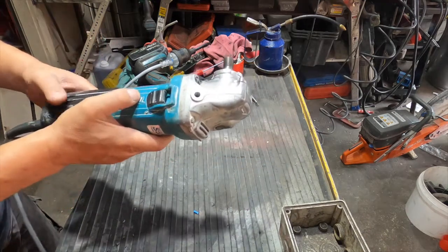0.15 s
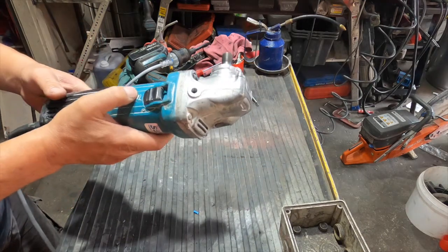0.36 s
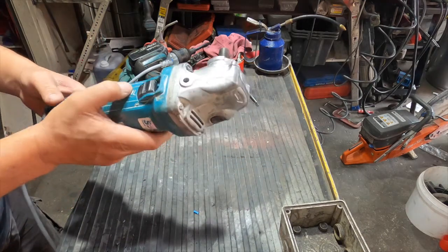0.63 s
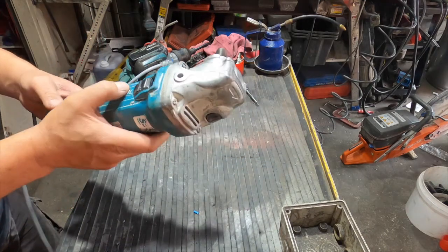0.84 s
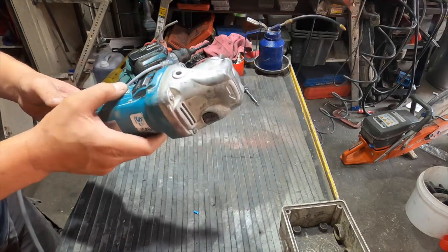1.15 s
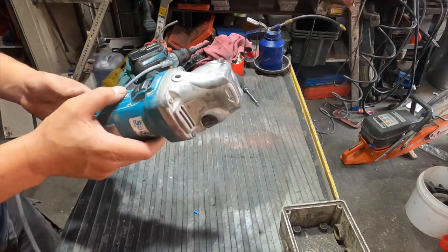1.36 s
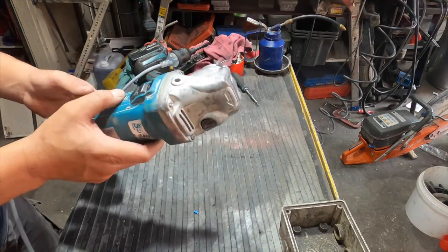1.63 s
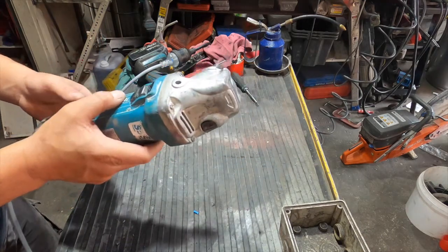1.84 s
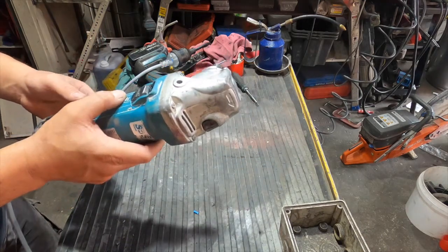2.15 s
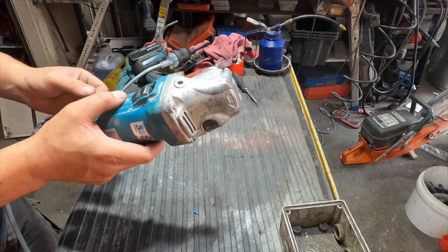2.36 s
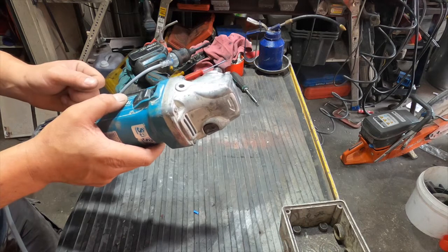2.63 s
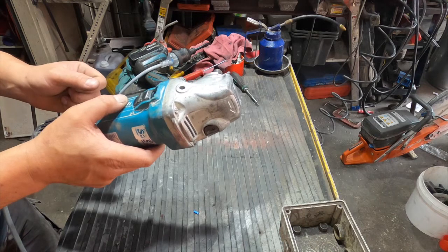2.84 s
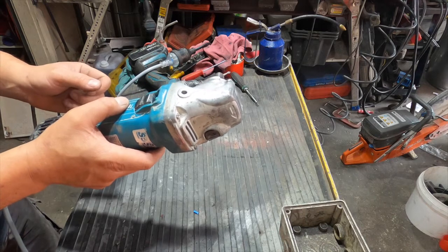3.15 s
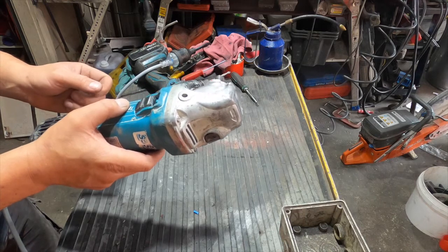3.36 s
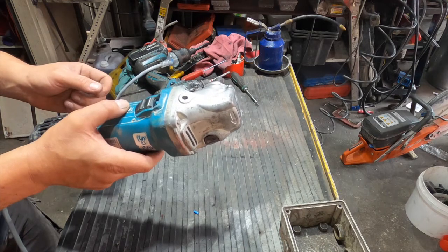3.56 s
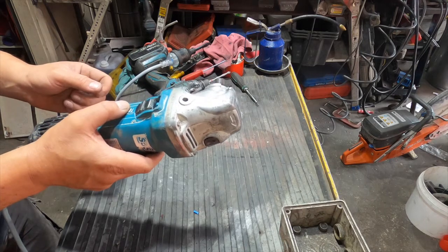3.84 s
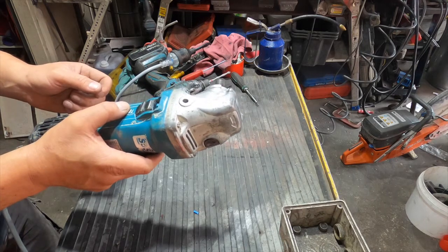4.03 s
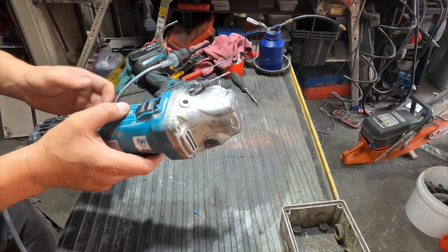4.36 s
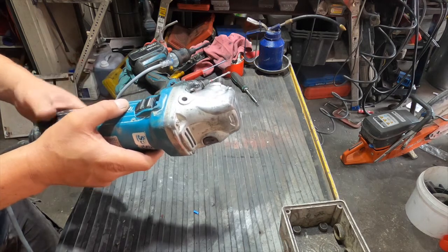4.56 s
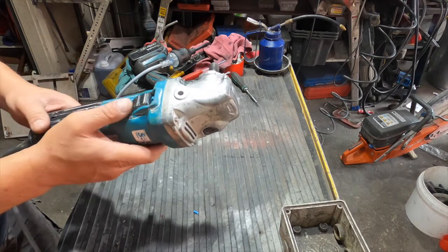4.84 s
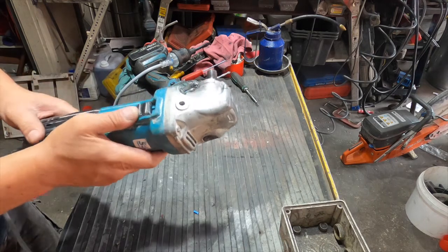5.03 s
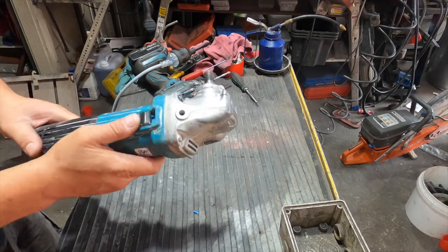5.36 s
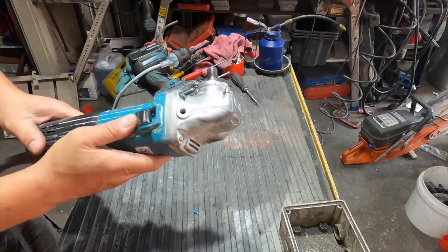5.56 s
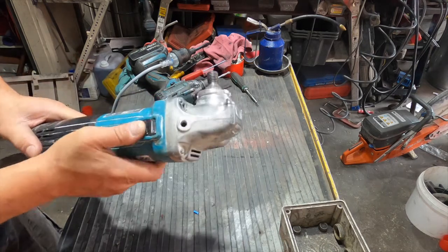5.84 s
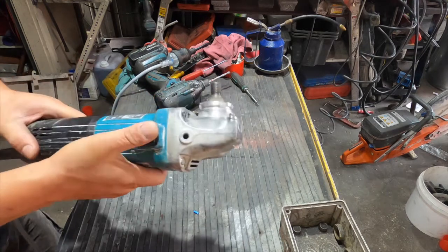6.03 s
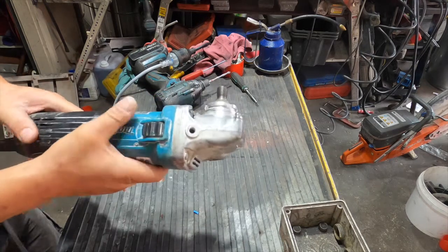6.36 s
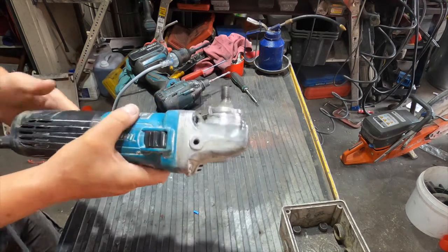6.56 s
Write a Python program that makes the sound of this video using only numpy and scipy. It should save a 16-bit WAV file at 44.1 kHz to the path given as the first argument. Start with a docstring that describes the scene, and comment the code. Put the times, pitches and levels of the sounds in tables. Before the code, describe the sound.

A power tool runs down freely in the hands, its piercing whine and rushing air falling steadily in pitch and strength. Metallic gear chatter becomes duller and sparser, ending in isolated tooth touches. Low rumble, faint bird-like chirps and casing ticks fill the pause. A hard switch click follows, then a coarse mains-rate buzz as the gears knock and the whine rises quickly. Near, dry stereo sound with a small workshop around it.

```python
"""A discless angle grinder coasts to rest in a workshop, is switched on again and soft-starts.
Loose bevel gears rattle as random knocks ringing housing modes; the fan blows as speed-shaped noise.
Brushes whine in sines locked to the rotor; under power, current pulses twice per mains cycle knock the
pinion and the windings hum. Behind lie low noise bands, wavering drones, gliding chirps and handling ticks."""
import sys
import numpy as np
from scipy import signal
from scipy.fft import rfft, irfft, next_fast_len
from scipy.io import wavfile
from scipy.ndimage import uniform_filter1d

SR = 44100
rng = np.random.default_rng(int(sys.argv[2]) if len(sys.argv) > 2 else 0)


def dump(signal):
    """Clip the signal to [-1, 1] and save it as 16-bit WAV at the path in sys.argv[1]."""
    limited = np.clip(np.atleast_2d(signal).T, -1, 1)
    pcm = np.round(limited * 32767).astype(np.int16)
    wavfile.write(sys.argv[1], SR, pcm)


N = 295470

# Gear housing modes. Each row: frequency in Hz, width in Hz, relative level in dB.
HOUSING_MODES = [(992, 124, -6.5), (1160, 190, -4.5), (1594, 250, -7), (2163, 190, 0), (2300, 198, 1.5),
                 (2567, 360, -0.5), (3100, 347, -2), (3355, 270, -0.5), (4323, 330, -4.5), (4700, 310, -10),
                 (5290, 370, -5.5), (6180, 490, -10), (7120, 620, -13), (7890, 330, -14.5),
                 (8560, 410, -17)]
# Gaps in the sound of housing and vents. Each row: frequency in Hz, width in Hz, share removed.
VALLEYS = [(2950, 200, 0.18), (4020, 210, 0.25), (5870, 290, 0.21), (7630, 270, 0.28)]
# Fan air through the vents. Each row: frequency in Hz, relative density in dB per Hz.
AIR_SPECTRUM = [(100, -41), (150, -17), (210, -17.5), (378, -16), (585, -14.5), (857, -11.5), (1110, -3.5),
                (1770, -5), (2210, -2.5), (3740, -6), (5280, -9.5), (6940, -10.5), (8300, -19.5),
                (9100, -14.5), (9900, -20), (12400, -26.5), (14000, -34), (15400, -45)]
# Uneven commutator bars. Each row: multiple of the rotor speed, level in dB against the bar rate.
BAR_PATTERN = [(19, -16), (20, -13), (21, -10), (22, -15), (24, 0), (25, -18), (26, -14), (27, -10),
               (29, -14), (32, -20), (34, -21), (36, -20), (37, -18), (38, -22), (39, -21), (40, -18),
               (45, -14), (46, -23), (48, -15), (49, -22), (51, -15), (53, -25), (56, -26)]
# Coasting brush whine, swelling where a bar tone crosses a housing mode.
# Each row: frequency in Hz, level in dB.
COAST_WHINE = [(300, -70), (900, -53), (1400, -49), (1700, -44), (1930, -41), (2080, -30), (2230, -24.5),
               (2400, -25.5), (2600, -28), (2850, -34), (3200, -32), (3450, -24.5), (3750, -27),
               (3935, -40), (4150, -31), (4450, -29.5), (4800, -33), (5170, -29.5), (5360, -42),
               (5600, -35), (5900, -33), (6370, -38), (6700, -34), (7340, -39), (8100, -48), (9000, -42),
               (10000, -52), (11000, -62)]
# Brush whine under power. Each row: bar rate in Hz, level in dB.
POWERED_WHINE = [(1200, -75), (2200, -46), (2500, -36), (2950, -32), (3250, -20.5), (3700, -27),
                 (4050, -36), (4450, -27), (4800, -33), (5200, -35), (5700, -44), (6300, -40), (7000, -50)]
# Radiation of the upper bar tones. Each row: frequency in Hz, gain in dB.
RADIATION = [(300, 0), (7500, 0), (10000, -5), (12000, -16), (16000, -30)]
# Unbalance and other orders, strongest at a speed where the body shakes.
# Each row: multiple of the rotor speed, level in dB, best speed in turns per s, spread in octaves.
SHAKE_ORDERS = [(1, -45, 390, .2), (1, -54, 270, .4), (3, -56, 120, .3), (3, -42, 390, .12),
                (6, -42, 190, .1), (12, -32, 430, .15), (48, -39, 75, .07), (48, -43, 50, .17),
                (37, -45, 72, .15), (45, -48, 58, .12), (13, -41, 300, .3), (15, -43, 260, .25),
                (16, -44, 135, .3), (27, -54, 50, .25), (29, -53, 46, .25)]
# Tones that need current.
# Each row: multiple of the rotor speed, level in dB, best speed in turns per s, spread in octaves.
LOADED_TONES = [(12, -20, 265, .29), (32, -34, 105, .14), (48, -44, 185, .08)]
# Low rumble. Each row: time in seconds, level in dB.
RUMBLE_LEVEL = [(0, -58), (.5, -55), (1.2, -56.5), (2, -54), (2.7, -51.5), (4.1, -45.5), (5.2, -48),
                (6.2, -50), (6.7, -54.5)]
# Rumble bands. Each row: frequency in Hz, width in Hz, relative level in dB, share of the swells.
RUMBLE_BANDS = [(70.8, 18.4, 1, 0.95), (130, 82, -3.5, 0.43)]
# Rumble swells and lulls. Each row: centre in seconds, width in seconds, change in dB.
RUMBLE_SWELLS = [(.8, 0.051, 17), (1.33, .06, 8), (1.7, 0.05, 7), (2.68, .07, 8), (3.22, .1, 5),
                 (4.1, 0.16, 4.5), (5.22, 0.1, 11), (5.47, 0.16, -5), (5.75, 0.18, 8.5), (6.06, 0.046, -6),
                 (6.23, .08, 8)]
# Distant drones. Each row: start in seconds, end in seconds, mean frequency in Hz, rms level in dB.
DRONES = [(-.1, 1.5, 168, -56.5), (2, 3.2, 164, -54), (3, 4.35, 173, -52.5), (3, 4.3, 95, -55.5)]
# Quiet of the shop. Each row: frequency in Hz, relative density in dB per Hz.
SHOP_SPECTRUM = [(110, -28), (180, -11), (213, -4.5), (292, -18), (339, -15), (639, -22.5), (1300, -18.5),
                 (2940, -20), (3820, -21), (4190, -28), (8000, -34), (9700, -31), (10500, -37),
                 (15400, -45)]
# Faint rustles of hands on the casing. Each row: centre in seconds, width in seconds, level in dB.
RUSTLES = [(4.92, .05, -61.5), (5.39, 0.064, -66), (5.58, 0.044, -66), (5.792, 0.008, -48),
           (5.85, 0.11, -54), (5.15, 0.19, -78)]
# The last gear teeth touch one by one. Each row: time in seconds, relative level in dB.
LAST_TEETH = [(4.403, -37), (4.4484, -29), (4.4878, -33), (4.514, -37), (4.5622, -41), (4.594, -38),
              (4.6194, -32.5), (4.659, -35), (4.691, -39), (4.7114, -39), (4.7333, -41), (4.7603, -45),
              (4.847, -40.5)]
# Ticks of hands on the casing. Each row: time in seconds, peak in dB, ring in Hz.
TICKS = [(4.896, -48, 6800), (4.935, -49, 1500), (5.050, -51, 3200), (5.385, -51, 5500), (5.437, -53, 1500),
         (5.472, -49, 3500), (5.748, -43, 1500), (5.761, -48, 4800), (5.778, -43, 1600), (5.792, -36, 2600)]
# Slide switch modes. Each row: frequency in Hz, width in Hz, relative level in dB.
SWITCH_MODES = [(1100, 700, -7), (2350, 800, -3), (3650, 700, 2), (4900, 1000, -6), (6200, 1100, -13),
                (8900, 1200, -17)]
# The casing buzzes on. Each row: frequency in Hz, width in Hz, peak in dB, decay in seconds.
SWITCH_TAIL = [(2400, 450, -44, .03), (3800, 650, -38, .016), (5200, 1200, -50, .014),
               (9000, 2000, -55, .012)]
# Far birds. Each row: start in seconds, length in seconds, start in Hz, end in Hz, relative level in dB.
CHIRPS = [(4.93, 0.052, 3500, 3480, -63), (5.08, .07, 4150, 4280, -72), (5.11, 0.082, 3170, 3160, -67),
          (5.206, .07, 3350, 3300, -71), (5.36, .06, 3800, 3850, -73), (5.53, 0.11, 3800, 3760, -72)]
# Pinion shaft modes. Each row: frequency in Hz, width in Hz, relative level in dB.
PINION_MODES = [(1020, 230, -8.5), (2310, 220, -5), (2580, 150, 0), (3060, 240, -3.5), (4190, 380, -1.5),
                (4690, 490, -5), (6400, 500, -18), (8530, 490, -17), (11600, 1500, -31)]
# First pinion knocks after power-on, uneven at first, then about every 10 ms.
# Each row: time in seconds, relative strike level in dB.
FIRST_KNOCKS = [(5.9044, -33), (5.9155, -25), (5.9334, -17), (5.9464, -15.5), (5.9547, -15),
                (5.9647, -12.5), (5.9757, -14), (5.9848, -12), (5.995, -13), (6.004, -14), (6.016, -14),
                (6.0238, -10), (6.035, -13), (6.044, -10.5), (6.0553, -14), (6.0644, -11), (6.0744, -14),
                (6.0836, -12), (6.095, -10.5)]
# Field windings. Each row: frequency in Hz, level in dB against the hum level.
HUM_TONES = [(199.2, -1), (301.5, 3.5), (398.4, 4.5), (500.6, -10), (602.9, -6), (699.8, 6), (802.1, -18),
             (904.4, -14)]
# Left-right likeness. Each row: frequency in Hz, likeness from 0 to 1.
LIKENESS = [(60, .997), (600, .98), (2500, .97), (4000, .95), (13000, .93)]
# Noise unlike at the two ports. Each row: frequency in Hz, gain in dB.
SPREAD = [(60, -19), (200, -14), (600, -12), (1200, -18), (2500, -14), (4500, -7.5), (6500, -5), (8500, -4),
          (13000, -2.5)]
# Left-right tilt of the whole scene. Each row: frequency in Hz, left minus right in dB.
LEAN = [(60, 2), (130, 0.5), (290, 2), (640, 0), (1410, 1.5), (3100, 3), (6820, 2), (15000, -6)]
# Slow left-right balance of the whole scene, on top of a fixed 3 dB to the right.
# Each row: time in seconds, left minus right in dB.
PAN = [(0, 1), (2.5, 1.8), (4.8, 2.5), (5.85, 3), (6.05, 2.5), (6.45, 2.5), (6.7, 1)]

# Coast: speed in turns per s; drag in turns per s each s: dry, per turn per s, per its square
COAST_FROM_TPS, FRICTION, VISCOUS, FAN_DRAG = 498.56, 67.27, .05154, 4.182e-4
# Soft start: ramps in turns per s each s
POWER_ON_S, SLOW_RAMP, FULL_RAMP_S, FAST_RAMP = 5.822, 329, 6.235, 590
CURRENT_ON_S, CURRENT_RISE_S = 5.85, 0.078
MAINS_HZ, PULSE_AT_S = 50, 6.0047

MESH_TEETH = 12
RATTLE_DB, RATTLE_KNEE_TPS, RATTLE_FALL_DB_PER_DECADE = -42, 39.2, 26
# Above this speed the teeth skim: per further turn per s the rattle loses dB, gains dB per octave of tilt
SKIM_FROM_TPS, SKIM_LOSS_DB, SKIM_BRIGHTENS_DB = 350, 0.23, 0.066
# Tilt in dB per octave near 200 turns per s, and its growth per doubling of speed
RATTLE_TILT_DB, TILT_PER_DOUBLING_DB = -0.34, 3
BRIGHTEST_HZ = 6850  # the tilt rises no further above this mode pitch
ONCE_A_TURN_DB = 2  # pinion slightly out of true
THROB_DB = 2.5  # per unit of current about the power envelope
POWERED_RATTLE_DB, POWERED_SKIM_SHARE = 1.5, 0.93
UNMESHED_S, UNMESHED_WIDTH_S, UNMESHED_DB = 5.96, 0.11, -4  # faint until the teeth engage
LOADED_S, LOADED_WIDTH_S, LOADED_DB = 6.48, 0.062, -23.5  # full torque holds the teeth together
# The lowest housing modes sound fullest at middle speed
LOW_MODES_DB, LOW_LIFT_DB, LOW_BEST_TPS, LOW_SPREAD_OCT = -8, 12.5, 222, 1.26
POWERED_LOW_MODES_DB = -5
SLOW_RING_DB, SLOW_RING_TPS = 5, 48  # slow touches favour modes near 2.5 kHz; half lift at this speed
TOUCH_TOP_HZ = 4500

AIR_DB, AIR_DB_PER_DOUBLING = -22.5, 6  # level near 400 turns per s
SLOTS = 12  # two commutator bars per slot
# Below this speed the upper coasting bar tones lose dB per halving
OVERTONE_FADE_FROM_TPS, OVERTONE_FADE_DB = 210, 16
POWERED_PATTERN_DB = -9  # the bar rate stands out more under power

DRONE_FADE_S, DRONE_WAVER_HZ, DRONE_WAVER_DB = 0.14, 4.61, 2.5
HUSH_DB, HUSH_SPREAD_DB = -62.5, 4  # the quiet comes from all round
SWITCH_S, SWITCH_DB, SWITCH_TOP_HZ = 5.7958, -13, 7500
# Strike level; every other knock weaker; above a speed, fade in dB per turn per s
KNOCK_DB, WEAK_HALF_DB, KNOCK_FADE_FROM_TPS, KNOCK_FADE_DB = -12, 0.5, 118, 0.4
BOUNCE_S, BOUNCE_DB = .0007, -8.5  # mean lag of the touches before and after each knock
HUM_DB, HUM_FADE_FROM_TPS, HUM_FADE_DB = -51.5, 190, 0.3
CUTOFF_HZ = 15750


def amp(db):
    """Decibels to an amplitude factor."""
    return 10 ** (np.asarray(db) / 20)


def rms_one(x):
    """Scales to rms 1."""
    return x / np.sqrt(np.mean(x ** 2) + 1e-20)


def peak_at(x, db):
    """Scales to a peak level."""
    return amp(db) * x / np.max(np.abs(x))


def in_time(rows):
    """Table columns as curves over all samples."""
    s, *columns = np.transpose(rows)
    return [np.interp(np.arange(N) / SR, s, column) for column in columns]


def at_hz(points, hz):
    """A table read along log frequency."""
    points = np.array(points)
    return np.interp(np.log(hz + 1), np.log(points[:, 0] + 1), points[:, 1])


def swell(s, width_s):
    """Smooth bump of height 1 in time."""
    return np.exp(-((np.arange(N) / SR - s) / width_s) ** 2)


def drift(rate_hz):
    """Slow random curve of rms 1: noise through two equal poles at every 40th sample."""
    r = np.exp(-80 * np.pi * rate_hz / SR)
    noise = rng.standard_normal(N // 40 + 2002)
    slow = signal.lfilter([1], [1, -2 * r, r * r], noise)[2000:]
    return np.interp(np.arange(N) / 40, np.arange(len(slow)), rms_one(slow))


def lowpass(x, top_hz):
    """Second-order treble cut."""
    return signal.sosfilt(signal.butter(2, top_hz, fs=SR, output="sos"), x)


def resonate(x, hz, width_hz):
    """Damped mode: a unit click rings with an envelope starting near 1."""
    r, w = np.exp(-np.pi * width_hz / SR), 2 * np.pi * hz / SR
    return signal.lfilter([0, np.sin(w)], [1, -2 * r * np.cos(w), r * r], x + 1e-18)


def clicks_at(seconds, db):
    """Single-sample clicks."""
    out = np.zeros(N)
    out[np.round(np.asarray(seconds) * SR).astype(int)] = amp(db)
    return out


def scratchy(clicks, length_s):
    """Turns each click into a short dying noise burst with little bass."""
    t = np.arange(round(5 * length_s * SR)) / SR
    burst = np.diff(rng.standard_normal(len(t)) * t * np.exp(-t / length_s))
    return signal.fftconvolve(clicks, burst / np.sqrt(np.sum(burst ** 2)))[:N]


def coloured_noise(spectrum):
    """Steady noise with the given spectrum, rms 1."""
    gain = amp(at_hz(spectrum, np.fft.rfftfreq(N, 1 / SR)))
    return rms_one(irfft(rfft(rng.standard_normal(N)) * gain, N))


def strike(modes, hits, brightness=0, low_db=0, ring_db=0):
    """Every mode rings from the hits; harder contact favours the high modes."""
    out = 0
    for i, (hz, width_hz, db) in enumerate(modes):
        tilt_db = brightness * np.log2(min(hz, BRIGHTEST_HZ) / 2000)
        lift_db = low_db * (hz < 1300) + ring_db * (2250 < hz < 2700)
        gain = (-1) ** i * amp(db + tilt_db + lift_db) * np.sqrt(width_hz / 200)
        out = out + gain * resonate(hits, hz, width_hz)
    return out


def rotor_speed():
    """Turns per s: drag slows the rotor to rest, then the soft start ramps it up in two stages."""
    coast = [COAST_FROM_TPS]
    for _ in range(N * 1000 // SR + 1):  # 1 ms steps
        tps = coast[-1]
        drag = FRICTION + VISCOUS * tps + FAN_DRAG * tps ** 2
        coast.append(max(tps - drag / 1000, 0))
    t = np.arange(N) / SR
    slow = SLOW_RAMP * np.clip(t - POWER_ON_S, 0, FULL_RAMP_S - POWER_ON_S)
    fast = FAST_RAMP * np.maximum(t - FULL_RAMP_S, 0)
    return np.interp(t * 1000, np.arange(len(coast)), coast) + slow + fast


def rattle_law(speed, current, powered):
    """Level, brightness and mode lifts of the rattle follow the speed and the torque."""
    skim = np.maximum(speed - SKIM_FROM_TPS, 0)
    level_db = RATTLE_DB - RATTLE_FALL_DB_PER_DECADE * np.log10(1 + (RATTLE_KNEE_TPS / (speed + 1)) ** 2)
    level_db = level_db - SKIM_LOSS_DB * skim * (1 - powered + POWERED_SKIM_SHARE * powered)
    once_a_turn = np.sin(2 * np.pi * np.cumsum(speed) / SR)
    level_db = level_db + ONCE_A_TURN_DB * np.clip(speed / 120, 0, 1) * once_a_turn
    level_db = level_db + LOADED_DB * swell(LOADED_S, LOADED_WIDTH_S)
    level_db = level_db + UNMESHED_DB * swell(UNMESHED_S, UNMESHED_WIDTH_S)
    level_db = level_db + THROB_DB * (current - powered) + POWERED_RATTLE_DB * powered
    brightness = RATTLE_TILT_DB + TILT_PER_DOUBLING_DB * np.log2((speed + 10) / 200)
    brightness = brightness + SKIM_BRIGHTENS_DB * skim
    octaves_off = np.log2(speed / LOW_BEST_TPS + 0.0011)
    low_db = LOW_MODES_DB + LOW_LIFT_DB * np.exp(-(octaves_off / LOW_SPREAD_OCT) ** 2)
    low_db = low_db + POWERED_LOW_MODES_DB * powered
    ring_db = SLOW_RING_DB / (1 + (speed / SLOW_RING_TPS) ** 2)
    return level_db, brightness, low_db, ring_db


def gear_rattle(speed, level_db, brightness, low_db, ring_db):
    """Loose teeth knock at random, about three times per tooth passed, so knocks part as the rotor slows."""
    born = rng.random(N) < (250 + 3.0 * MESH_TEETH * speed) / SR
    strength = amp(2.44 * np.minimum(rng.exponential(1, N), 4))
    hits = born * strength * rng.choice([-1, 1], N)
    even = hits / np.sqrt(uniform_filter1d(hits ** 2, size=SR // 10) + 1e-4)  # level out over 0.1 s
    return amp(level_db + 0.86 * drift(44)) * strike(HOUSING_MODES, even, brightness, low_db, ring_db)


def fan_air(speed):
    """Air noise grows with speed, the treble faster than the bass."""
    air = coloured_noise(AIR_SPECTRUM)
    low = lowpass(air, 5000)
    doublings = np.log2(speed / 400 + 0.0012)
    level = amp(AIR_DB + AIR_DB_PER_DOUBLING * doublings + 1.0 * drift(6.0))
    return level * (low + amp(3.0 * doublings) * (air - low))


def with_valleys(x):
    """Takes a share out at each gap."""
    for hz, width_hz, share in VALLEYS:
        x = x - share * signal.lfilter(*signal.iirpeak(hz, hz / width_hz, SR), x)
    return x


def rotor_tones(speed, current, powered):
    """Bar, slot and unbalance tones turn with the rotor; under power they roughen and throb with the current."""
    turn = 2 * np.pi * np.cumsum(speed) / SR
    rough = .95 * powered * drift(120)  # phase in rad
    bar_rate = 2 * SLOTS * speed
    fade_db = OVERTONE_FADE_DB * np.minimum(np.log2(speed / OVERTONE_FADE_FROM_TPS + 1e-3), 0)
    upper_db = at_hz(COAST_WHINE, bar_rate) + fade_db
    powered_db = at_hz(POWERED_WHINE, bar_rate)

    def tone(k):
        phase = k * turn + rng.uniform(0, 2 * np.pi) + rough
        return np.sqrt(2) * np.sin(phase) * (k * speed < .4 * SR)

    def bell_db(best_tps, spread_oct):
        return -4.4 * (np.log2(speed / best_tps + 1e-3) / spread_oct) ** 2

    def bar_db(k):
        if k > 30:
            coasting_db = upper_db + at_hz(RADIATION, k * speed)
        else:
            coasting_db = at_hz(COAST_WHINE, k * speed)
        level_db = (1 - powered) * coasting_db + powered * powered_db - 40 * (speed < 5)
        return level_db + POWERED_PATTERN_DB * powered * (k != 2 * SLOTS)

    bars = sum(amp(db + bar_db(k) + 1.3 * drift(14)) * tone(k) for k, db in BAR_PATTERN)
    shake = 0
    for k, db, best_tps, spread_oct in SHAKE_ORDERS:
        coasting_only = 1 - powered * (k > SLOTS)  # these swells above the slot order sound only while coasting
        shake = shake + amp(db + bell_db(best_tps, spread_oct)) * tone(k) * coasting_only
    loaded = 0
    for k, db, best_tps, spread_oct in LOADED_TONES:
        loaded = loaded + amp(db + bell_db(best_tps, spread_oct) + 3.0 * drift(60)) * tone(k)
    return (1 - powered + current) * bars + shake + current * loaded


def rumble():
    """Two low bands of noise swell together; wavering drones fade in and out."""
    t = np.arange(N) / SR
    level_db = in_time(RUMBLE_LEVEL)[0]
    swells_db = sum(db * swell(s, width_s) for s, width_s, db in RUMBLE_SWELLS)
    out = np.zeros(N)
    for hz, width_hz, db, share in RUMBLE_BANDS:
        noise = rng.standard_normal(N)
        band = rms_one(resonate(resonate(noise, hz, width_hz), hz, width_hz))
        out += amp(level_db + db + share * swells_db) * band
    for start, end, hz, db in DRONES:
        level = amp(db + DRONE_WAVER_DB * drift(4.2))
        fade = np.clip(np.minimum(t - start, end - t) / DRONE_FADE_S, 0, 1)
        phase = 2 * np.pi * np.cumsum(hz + DRONE_WAVER_HZ * drift(1.97)) / SR
        out += level * fade * np.sqrt(2) * np.sin(phase)
    return out


def hush():
    """Steady noise behind the tool, with a mid-band rustle that comes and goes."""
    rustle = rms_one(resonate(rng.standard_normal(N), 3400, 2430.0))
    rustling = sum(amp(db) * swell(s, width_s) for s, width_s, db in RUSTLES)
    return amp(HUSH_DB) * coloured_noise(SHOP_SPECTRUM) + rustling * amp(2.0 * drift(38.7)) * rustle


def last_teeth():
    """Single soft touches of the teeth ring the housing."""
    touches = 0
    for s, db in LAST_TEETH:
        contact = scratchy(clicks_at([s], 0), 0.0014)
        touches = touches + peak_at(strike(HOUSING_MODES, contact, -7.5, -7, SLOW_RING_DB), db + 1.5)
    return lowpass(touches, TOUCH_TOP_HZ)


def handling():
    """Short scratchy ticks ring the plastic casing; the switch snaps with a noisy tail."""
    out = np.zeros(N)
    for s, db, hz in TICKS:
        scratch = scratchy(clicks_at([s], 0), .0006)
        out += peak_at(resonate(resonate(scratch, hz, .5 * hz), hz, .7 * hz), db)
    snap = sum(scratchy(clicks_at([s], 0), .0005) for s in (SWITCH_S, SWITCH_S + .0013))
    modes = sum(amp(db) * resonate(snap, hz, width_hz) for hz, width_hz, db in SWITCH_MODES)
    out += peak_at(lowpass(modes, SWITCH_TOP_HZ), SWITCH_DB)
    for hz, width_hz, db, decay_s in SWITCH_TAIL:
        buzz = scratchy(clicks_at([SWITCH_S], 0), decay_s)
        out += peak_at(resonate(resonate(buzz, hz, width_hz), hz, 2 * width_hz), db)
    return out


def birds():
    """Thin whistles: sines gliding linearly under a smooth envelope."""
    out = np.zeros(N)
    for s, length_s, start_hz, end_hz, db in CHIRPS:
        n = round(length_s * SR)
        phase = 2 * np.pi * np.cumsum(np.linspace(start_hz, end_hz, n)) / SR
        out[round(s * SR):][:n] += 2 * amp(db) * np.sin(phase) * np.hanning(n)
    return out


def mains_drive(speed, powered):
    """Each half cycle the torque pulse throws the pinion on the gear; the windings hum."""
    t = np.arange(N) / SR
    knock_db = KNOCK_DB - KNOCK_FADE_DB * np.maximum(speed - KNOCK_FADE_FROM_TPS, 0)
    hum_db = HUM_DB - HUM_FADE_DB * np.maximum(speed - HUM_FADE_FROM_TPS, 0)
    half_cycle = np.arange(10, 69)
    chance = rng.standard_normal((len(half_cycle), 2))
    times = PULSE_AT_S + half_cycle / (2 * MAINS_HZ) + .0005 * chance[:, 0]
    levels_db = np.interp(times, t, knock_db) - WEAK_HALF_DB * (half_cycle % 2) + 1.3 * chance[:, 1]
    first_s, first_db = np.transpose(FIRST_KNOCKS)
    times = np.append(times, first_s)
    levels_db = np.append(levels_db, first_db)
    before_s, after_s = BOUNCE_S * rng.uniform(.4, 1.6, (2, len(times)))
    hits = clicks_at(times, levels_db)
    hits -= clicks_at(times - before_s, levels_db + BOUNCE_DB)
    hits -= clicks_at(times + after_s, levels_db + BOUNCE_DB)
    knocks = amp(-5) * strike(PINION_MODES, hits)
    hum = 0
    for hz, db in HUM_TONES:
        phase = 2 * np.pi * hz * t + rng.uniform(0, 2 * np.pi)
        hum = hum + amp(db + 2.0 * drift(10.0)) * np.sin(phase)
    return knocks + powered * amp(hum_db) * hum


def two_ports(x, wide, pan_db):
    """Direct sound, left one sample later; each port adds its own echoes and opposite-sign wide noise."""
    size = next_fast_len(N + SR // 2)
    hz = np.fft.rfftfreq(size, 1 / SR)
    alike = np.clip(at_hz(LIKENESS, hz), 0, 1)
    t = np.arange(SR // 4) / SR
    tails = rng.standard_normal((2, len(t))) * amp(-60 * t / 0.045) * (t > .001)  # 60 dB in 45 ms
    echoes = rfft(tails / np.sqrt(np.sum(tails ** 2, axis=1, keepdims=True)), size)
    side = np.array([[.5], [-.5]])  # left, right
    direct = np.exp(-2j * np.pi * hz / SR * (side + .5))
    heard = rfft(x, size) * (np.sqrt(alike) * direct + np.sqrt(1 - alike) * echoes)
    heard = heard + 2 * side * direct * rfft(wide, size) * amp(at_hz(SPREAD, hz))
    leaned = irfft(amp(side * at_hz(LEAN, hz)) * heard, size)[:, :N]
    return leaned * amp(side * (pan_db - 3.0))


def scene():
    """The tool in the hands, the workshop behind it."""
    t = np.arange(N) / SR
    speed = rotor_speed()
    powered = np.clip((t - CURRENT_ON_S) / CURRENT_RISE_S, 0, 1)
    pulses = np.cos(np.pi * 2 * MAINS_HZ * (t - PULSE_AT_S + .001)) ** 2
    current = powered * (.08 + 1.5 * pulses)
    law = rattle_law(speed, current, powered)

    def roar():
        return with_valleys(gear_rattle(speed, *law) + fan_air(speed))

    tool = roar() + rotor_tones(speed, current, powered) + last_teeth() + mains_drive(speed, powered)
    near = tool + rumble() + hush() + handling() + birds()
    wide = roar() + rumble() + amp(HUSH_SPREAD_DB) * hush()  # fresh noise, unlike at the ports
    return two_ports(near, wide, in_time(PAN)[0])


def record(dry):
    """Steep treble cut, 60 dB down from the cutoff."""
    return signal.sosfilt(signal.cheby2(12, 60, CUTOFF_HZ, fs=SR, output="sos"), dry)


dry = scene()
out = record(dry)
dump(out)
```